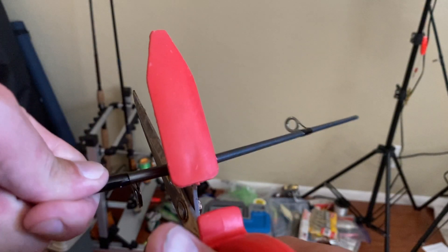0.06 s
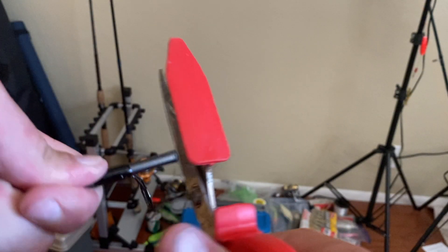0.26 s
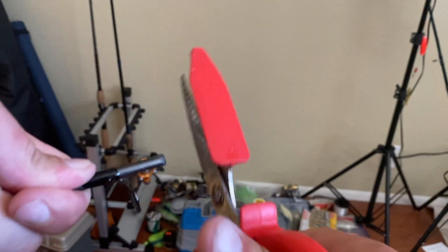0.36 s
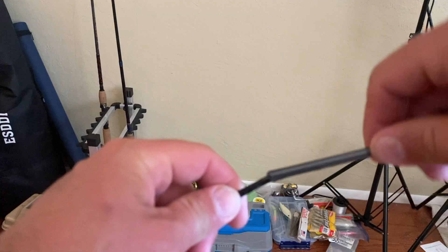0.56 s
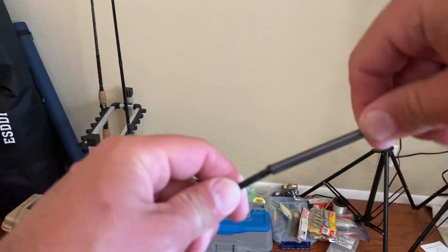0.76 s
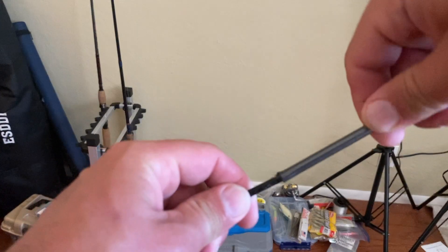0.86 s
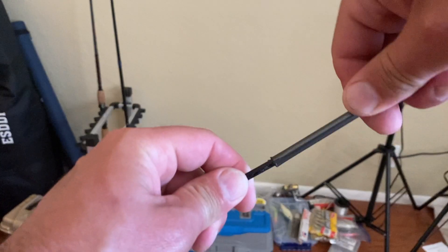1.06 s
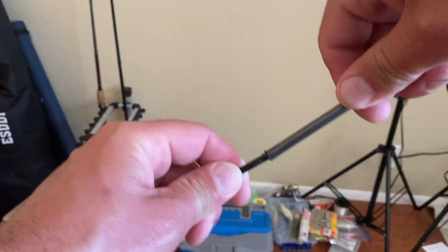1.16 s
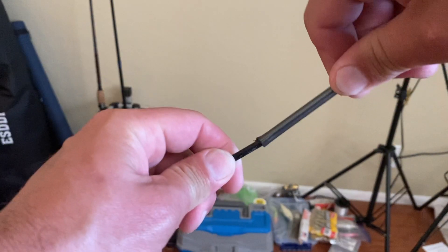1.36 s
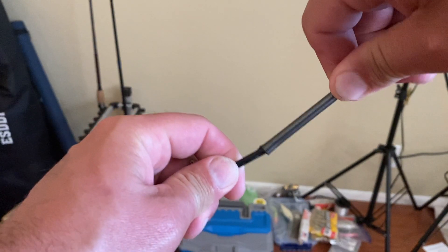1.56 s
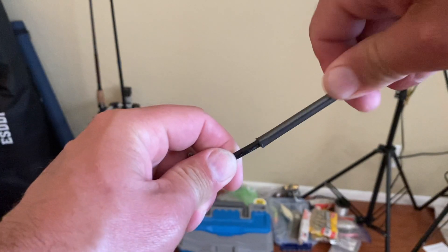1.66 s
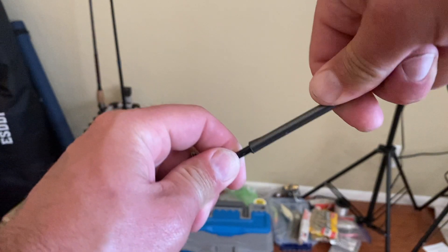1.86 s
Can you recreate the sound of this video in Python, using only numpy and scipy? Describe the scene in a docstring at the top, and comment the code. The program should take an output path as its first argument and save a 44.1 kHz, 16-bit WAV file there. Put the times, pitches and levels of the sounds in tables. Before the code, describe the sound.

Hand shears snap through a thin fishing rod, followed by faint handling ticks and knocks.

```python
"""Hand shears bite through a thin hollow fishing rod, close to a stereo microphone in a small quiet room.
The rod wall creaks under the blade and splits in a burst of cracks; the jaws clack shut and the freed
rod whips with a falling thump. Then fingers slide the loose piece along the rod, with small ticks,
two clear knocks and a short scrape back. Low room air and a faint hum lie behind it all."""
import sys
import numpy as np
from scipy import signal
from scipy.fft import rfft, irfft, next_fast_len
from scipy.io import wavfile
from scipy.ndimage import uniform_filter1d

SR = 44100
rng = np.random.default_rng(int(sys.argv[2]) if len(sys.argv) > 2 else 0)


def transcribe(u):
    """Save the signal u as a 16-bit wav file named by the first command-line argument.

    u: samples, shape (n,) or (channels, n), limited to [-1, 1]; the rate is SR.
    q: integer samples, one column per channel.
    """
    v = np.clip(np.atleast_2d(u).T, -1, 1)
    q = np.round(v * 32767).astype(np.int16)
    wavfile.write(sys.argv[1], SR, q)


N = 83790


def undb(db):
    """Decibels to gain."""
    return 10 ** (np.asarray(db) / 20)


def unit(x):
    """Scale to rms 1."""
    return x / np.sqrt(np.mean(x ** 2))


def at_hz(points, hz):
    """Read (Hz, value) points on a log-frequency axis."""
    freqs, values = np.array(points, float).T
    return np.interp(np.log(np.maximum(hz, 1)), np.log(freqs), values)


def colour(x, points):
    """Minimum-phase filter through (Hz, dB) points; keeps the power of white noise."""
    size = 2 * next_fast_len(N)
    hz = np.arange(size // 2 + 1) * SR / size
    cepstrum = irfft(np.log(unit(undb(at_hz(points, hz)))))
    cepstrum[1:size // 2] *= 2
    cepstrum[size // 2 + 1:] = 0
    return irfft(rfft(x, size) * np.exp(rfft(cepstrum)))[..., :N]


def add(out, x, start):
    """Mix a sound in at a time in seconds."""
    i = max(int(round(start * SR)), 0)
    out[..., i:i + x.shape[-1]] += x[..., :max(N - i, 0)]


def pan(left_db):
    """Channel gains that favour the left by left_db."""
    return undb(np.array([[left_db], [-left_db]]) / 2)


def drift(rate_hz):
    """Slow random wander, rms 1."""
    hold = int(SR / rate_hz)
    steps = np.repeat(rng.standard_normal(256), hold)[:N]
    return unit(uniform_filter1d(uniform_filter1d(steps, hold), hold))


def ring(modes):
    """Decaying modes of a struck body; neighbours swing in opposite senses."""
    t = np.arange(4096) / SR
    return sum((-1) ** k * undb(db) * np.cos(2 * np.pi * hz * t) * undb(-60 * t / t60)
               for k, (hz, db, t60) in enumerate(modes))


def small_body(x, cutoff_hz=580):
    """Thin parts radiate little bass."""
    return signal.sosfilt(signal.butter(4, cutoff_hz, "high", fs=SR, output="sos"), x)


def burst(decay_s):
    """A tiny stereo spray of noise, its energy set by its decay."""
    env = np.exp(-np.arange(1024) / SR / decay_s)
    spray = np.array([unit(noise * env) for noise in rng.standard_normal((2, env.size))])
    return spray * np.sqrt(np.mean(env ** 2))


def clicks(rows, spectrum):
    """Brief contacts, one noise burst each."""
    out = np.zeros((2, N))
    for start, db, decay_s in rows:
        add(out, undb(db) * burst(decay_s), start)
    return colour(out, spectrum)


def friction(strokes, spectrum, grains_per_s=8000, spread_db=2, release_s=.0045):
    """Dense stick-slip grains of uneven size; each stroke swells and fades."""
    t = np.arange(N) / SR
    slips = rng.random(N) < grains_per_s / SR
    sizes = undb(spread_db * np.minimum(rng.exponential(size=N), 3))
    grains = unit(slips * sizes * rng.standard_normal((2, N)))
    env = sum(undb(db) * np.abs(np.sin(np.pi * np.clip((t - start) / length, 0, 1))) ** .4
              for start, length, db in strokes)
    pole = np.exp(-1 / (SR * release_s))
    return colour(grains * signal.lfilter([1 - pole], [1, -pole], env), spectrum)


# The air all round the microphone. Each row: frequency in Hz, relative level in dB.
AIR_COLOUR = [(25, -19.5), (42, -2), (60, 1.5), (80, -2), (130, -2), (220, -6), (420, -7), (620, -15),
              (1100, -22), (2000, -29.5), (4000, -42.5), (8000, -50.5), (16000, -51)]


def background(hum_hz=59.1, bass_width=.2):
    """Low room air, nearly centred in the bass, and a wavering hum."""
    mid, side = colour(rng.standard_normal((2, N)), AIR_COLOUR)
    upper_side = signal.sosfilt(signal.butter(1, 450, "high", fs=SR, output="sos"), side)
    side = bass_width * side + (1 - bass_width) * upper_side
    waver = 1 + .35 * drift(6.5)
    hum = np.sqrt(2) * waver * np.sin(2 * np.pi * hum_hz * np.arange(N) / SR + .5 * drift(8.7))
    return undb(-55.5) * np.array([mid + side, mid - side]) + undb(-57.5) * hum


# How long the small room rings. Each row: frequency in Hz, time to fall 60 dB in seconds.
ROOM_T60 = [(200, 0.6), (1000, 1.32), (2300, 0.72), (4000, 0.89), (6000, 0.56), (10000, 0.57),
            (15000, 0.28)]
# The tone its walls send back. Each row: frequency in Hz, relative level in dB.
ROOM_COLOUR = [(100, -10), (800, -2.5), (1700, 2), (2400, 4), (3200, 0), (5000, -1), (7000, 0), (10000, 0),
               (15000, -4)]


def room(x, delay_s=.0044, early_s=.0092, size=32768):
    """Near walls return dense early reflections and a diffuse tail whose treble dies first."""
    t, hz = np.arange(size) / SR, np.arange(size // 2 + 1) * SR / size
    noise = rfft(rng.standard_normal((2, size)))
    edges = np.geomspace(60, SR / 2, 14)
    tail = np.zeros((2, size))
    for lo, hi in zip(edges, edges[1:]):
        band = irfft(noise * ((hz >= lo) & (hz < hi)))
        tail += band * undb(-60 * t / at_hz(ROOM_T60, np.sqrt(lo * hi)))
    tail *= (t > delay_s) * (1 + undb(7) * np.exp(-t / early_s))
    echo = signal.fftconvolve(x, unit(tail) / np.sqrt(size), axes=1)[:, :N]
    return undb(-11.5) * colour(echo, ROOM_COLOUR)


# Fingers on the rod, close in. Each row: start in seconds, length in seconds, level in dB.
RUBS = [(.605, .09, -69), (.745, 0.079, -66), (.882, 0.011, -50), (.893, 0.016, -49), (.905, 0.067, -67),
        (1.03, 0.049, -69.5), (1.19, 0.16, -76), (1.335, 0.075, -70), (1.585, .05, -69.5),
        (1.616, 0.052, -56.5), (1.66, .035, -59.5)]
# Their dry hiss. Each row: frequency in Hz, relative level in dB.
RUB_COLOUR = [(300, -7), (1200, -3.5), (2200, 3.5), (3500, -5.5), (6000, -4.5), (8500, -6), (12000, 2.5),
              (16000, -5.5)]


def rubs():
    """Skin grips and slips on the rod in grainy strokes."""
    return friction(RUBS, RUB_COLOUR)


# The loose piece travels along the rod. Each row: start in seconds, length in seconds, level in dB.
SLIDES = [(.79, 0.43, -67), (1.10, 0.44, -66)]
# Near-harmonic resonances of its hollow bore. Each row: frequency in Hz, relative level in dB.
BORE_COLOUR = [(400, 3), (1000, -1), (1330, 8.5), (1650, -5), (2150, 1), (2720, 2.5), (3400, -5.5),
               (4300, -3.5), (5300, -8.5), (6500, -21), (16000, -40)]
# The scrape back. Each row: start in seconds, length in seconds, level in dB.
SCRAPES = [(1.692, .03, -56.5), (1.705, 0.075, -55.5), (1.755, 0.067, -66.5)]
# Its thin, sharp tone. Each row: frequency in Hz, relative level in dB.
SCRAPE_COLOUR = [(800, -15), (2700, -8.5), (4500, -10), (4950, 3.5), (5250, -7.5), (6400, -12.5),
                 (7500, -6), (8100, -7), (9200, -5.5), (12000, -6.5), (16000, -15.5)]


def sliding():
    """Tube runs on tube with fine, smooth friction: a hollow slide, then a bright scrape."""
    smooth = dict(grains_per_s=22000, spread_db=-2)
    return friction(SLIDES, BORE_COLOUR, **smooth) + friction(SCRAPES, SCRAPE_COLOUR, **smooth)


# Small taps near the microphone. Each row: start in seconds, level in dB, decay in seconds.
TICKS = [(.0826, -32, 0.00099), (.0972, -36.5, 0.00059), (.1545, -49, .001), (.1585, -54, 0.00087),
         (.1712, -56, .0006), (.1965, -53, 0.0011), (.2050, -44, 0.0012), (.2175, -46.5, .001),
         (.6075, -44, .0008), (.6820, -47.5, 0.0011), (.7665, -54, .001), (.8868, -41, 0.0018),
         (.9525, -56.5, .0008), (1.149, -60, 0.0006), (1.2062, -56.5, .0007), (1.268, -49, 0.0013),
         (1.3835, -50.5, .001), (1.4555, -61, 0.00051), (1.6365, -42.5, .001), (1.6502, -39, 0.0016),
         (1.6900, -49, .002), (1.6985, -38.5, 0.0013)]
# Their crisp tone. Each row: frequency in Hz, relative level in dB.
TICK_COLOUR = [(300, -18.5), (1200, -11), (2200, -6), (4000, -10), (7500, -1.5), (12000, 3), (16000, -1)]


def ticks():
    """Blade and fingernails tick drily on the rod."""
    return clicks(TICKS, TICK_COLOUR)


# Snags late in the slide. Each row: start in seconds, level in dB.
CATCHES = [(1.2680, -57), (1.2770, -47.5), (1.2921, -45.5), (1.3071, -40), (1.393, -60), (1.4163, -41.5),
           (1.4552, -46.5)]
# Their narrow treble peak. Each row: frequency in Hz, relative level in dB.
CATCH_COLOUR = [(1000, -13.5), (3800, -20), (5300, 0), (6200, -7), (8000, -24.5), (16000, -27)]


def catches(decay_s=.00092):
    """The cut edges catch on each other."""
    return clicks([(start, db, decay_s) for start, db in CATCHES], CATCH_COLOUR)


# The pieces meet, dead centre. Each row: start in seconds, level in dB.
KNOCKS = [(0.6081, -39), (1.6300, -28.5), (1.6555, -28.5)]
# The gripped rod's modes. Each row: frequency in Hz, level in dB, time to fall 60 dB in seconds.
GRIP_MODES = [(203.6, -21.5, 0.036), (2600, -17, 0.0068)]
# The dull tone of a knock. Each row: frequency in Hz, relative level in dB.
KNOCK_COLOUR = [(80, -3.5), (300, -3.5), (500, -2.5), (1100, 3), (1900, -3), (2650, 1), (4500, -16),
                (16000, -30)]


def knocks():
    """The pieces knock together: blunt contacts, each with a short low ring."""
    out, blow = np.zeros((2, N)), ring(GRIP_MODES)
    blow[0] += 1  # the impact itself
    for start, db in KNOCKS:
        add(out, undb(db) * blow, start)
    return colour(out, KNOCK_COLOUR)


# The squeeze before the split. Each row: start in seconds, length in seconds, level in dB.
CREAKS = [(-.04, 0.17, -63), (.14, 0.091, -67.5), (.195, 0.07, -59.5), (.222, 0.012, -50.5)]
# Its tone from close up. Each row: frequency in Hz, relative level in dB.
CREAK_COLOUR = [(300, -16), (1200, -6.5), (2300, -2), (3500, -5), (5000, -1), (7000, 1), (9500, 1),
                (12000, -4), (16000, -6)]


def creaks():
    """The blade sticks and slips as it presses into the rod."""
    return friction(CREAKS, CREAK_COLOUR)


def whip(start_s=.2425, end_hz=63.7, drop_hz=291, glide_s=.0045):
    """The freed rod flexes: fast bending waves come first, so the thump falls in pitch."""
    attack_s, hold_s, release_s = .004, .026, .005
    t = np.maximum(np.arange(N) / SR - start_s, 0)
    cycles = end_hz * t + drop_hz * glide_s * (1 - np.exp(-t / glide_s))
    env = np.minimum(t / attack_s, 1) * np.exp(-np.maximum(t - hold_s, 0) / release_s)
    return undb(-25.5) * env * np.sin(2 * np.pi * cycles)


# The shears close, left of the microphone. Each row: start in seconds, level in dB.
JAW_BLOWS = [(.2376, -28.5), (0.2395, -18)]
# The jaws' modes. Each row: frequency in Hz, level in dB, time to fall 60 dB in seconds.
JAW_MODES = [(669, -3, 0.0074), (784, -1, 0.016), (1269, -4.5, 0.011), (1468, -5, .012)]


def jaws(right_lag_s=.0001):
    """The jaws clack together as the rod gives way."""
    out = np.zeros((2, N))
    for start, db in JAW_BLOWS:
        for channel, lag_s in enumerate((0, right_lag_s)):
            add(out[channel], undb(db) * ring(JAW_MODES), start + lag_s)
    return small_body(out) * pan(left_db=6)


# The rod splits right at the microphone.
# Each row: start in seconds, relative level in dB, lag of the left channel in milliseconds.
CRACKS = [(0.2227, -28.5, 0), (0.226, -38.5, .1), (0.2305, -28.5, 0), (0.2358, -22.5, 0),
          (0.2366, -13.5, .05), (0.2365, -9, .1), (.2372, 0, .2), (.2376, 0, .04), (0.2378, -6.5, -.05),
          (0.2385, -8, .1), (0.2391, -11, -.1), (.2400, -9.5, .1), (.2417, -17.5, 0), (0.2455, -18.5, .1),
          (.2478, -17.5, -.1), (.2495, -21, .1)]
# The rod wall's modes. Each row: frequency in Hz, relative level in dB, time to fall 60 dB in seconds.
ROD_MODES = [(2100, -20.5, .008), (2855, -20, 0.01), (3506, -17.5, 0.016), (4970, -31, 0.015),
             (6870, -6.5, 0.00665), (7470, -6, 0.0055), (9140, -19, .007), (11500, -11.5, .006),
             (12120, -14, .004), (14300, -16.5, .004), (14950, -16, 0.0048)]
# The bright spray of splinters. Each row: frequency in Hz, relative level in dB.
SPLINTER_COLOUR = [(200, -24.5), (520, -22), (800, -6), (1400, -2.5), (3000, -4), (7000, 2), (12000, 1),
                   (16000, 0)]


def snap():
    """Each crack sprays splinters and rings the rod wall; returns both."""
    splinters, wall = np.zeros((2, N)), np.zeros((2, N))
    wall_ring = undb(-5.5) * ring(ROD_MODES)
    for start, db, lag_ms in CRACKS:
        spray = undb(-8) * burst(decay_s=.00033)
        for channel, lag_s in enumerate((lag_ms / 1000, 0)):
            add(wall[channel], undb(db) * wall_ring, start + lag_s)
            add(splinters[channel], undb(db) * spray[channel], start + lag_s)
    return colour(splinters, SPLINTER_COLOUR), small_body(wall)


def scene():
    """The cut and the handling close to the microphone, with the room behind."""
    splinters, wall = snap()
    clack = jaws()
    handling = ticks() + catches() + knocks() + creaks() + rubs() + sliding()
    direct = (splinters + wall) * pan(left_db=1.5) + clack + whip() + handling
    echo = room(splinters + undb(-12) * (wall + clack) + undb(-6) * handling)
    return direct + echo + background()


def record(dry):
    """The recorder cuts off steeply above 15.9 kHz."""
    return signal.sosfilt(signal.ellip(10, .2, 80, 15900, fs=SR, output="sos"), dry)


dry = scene()
out = record(dry)
transcribe(out)
```